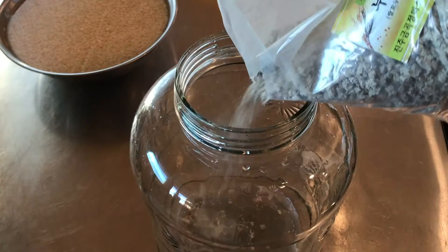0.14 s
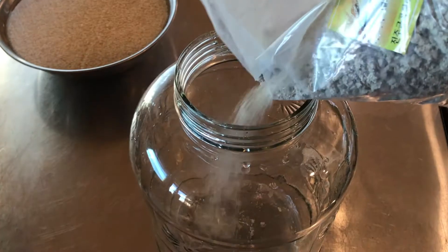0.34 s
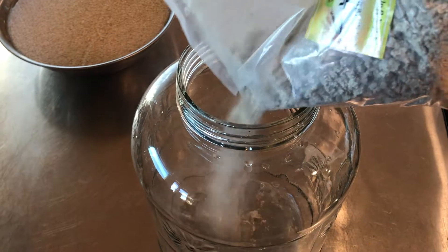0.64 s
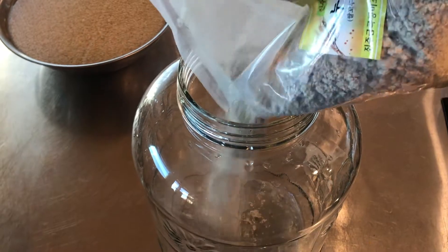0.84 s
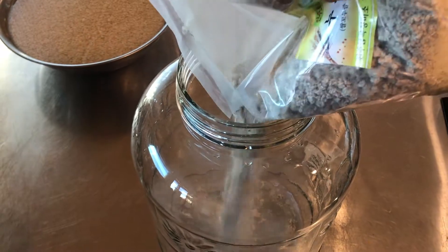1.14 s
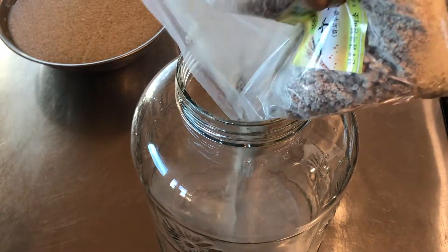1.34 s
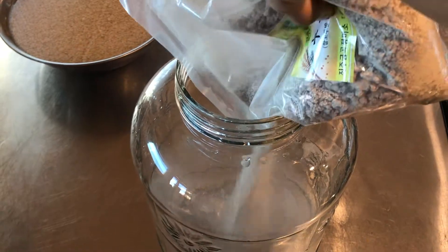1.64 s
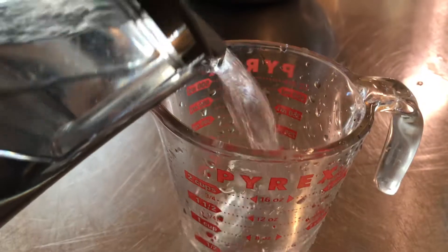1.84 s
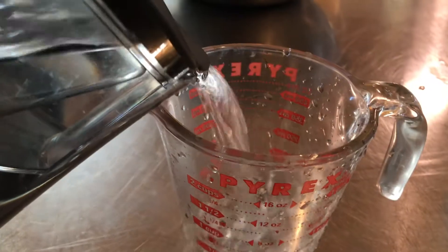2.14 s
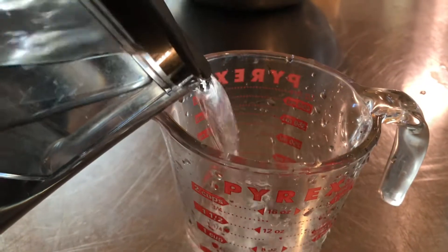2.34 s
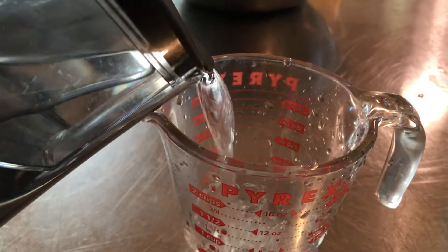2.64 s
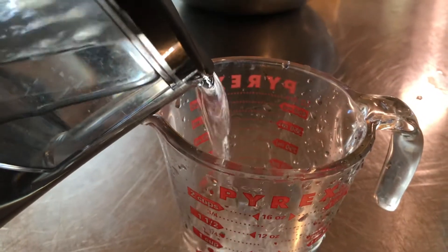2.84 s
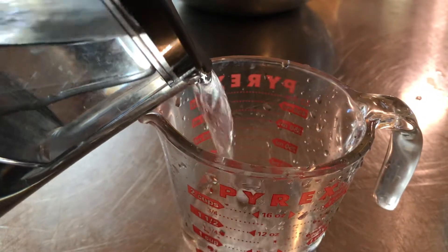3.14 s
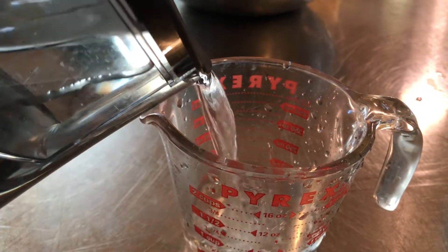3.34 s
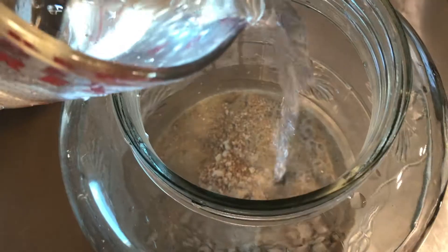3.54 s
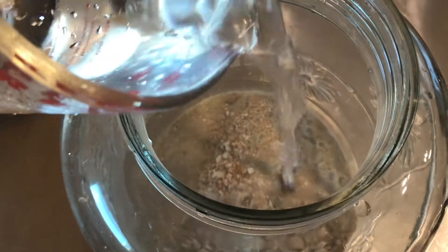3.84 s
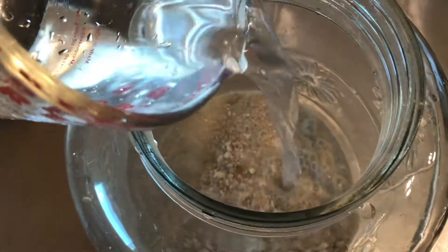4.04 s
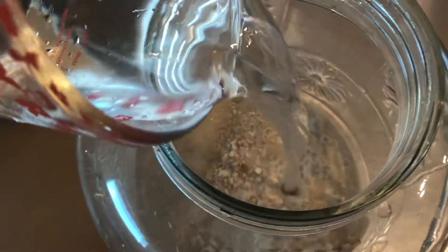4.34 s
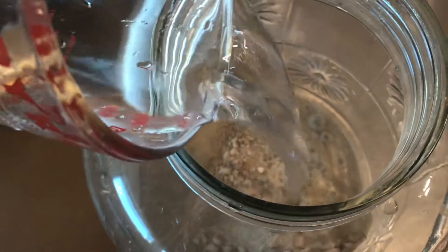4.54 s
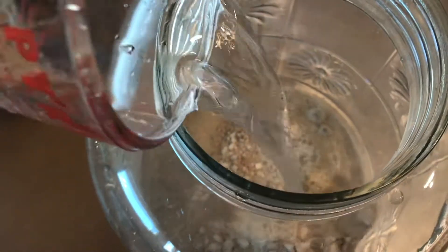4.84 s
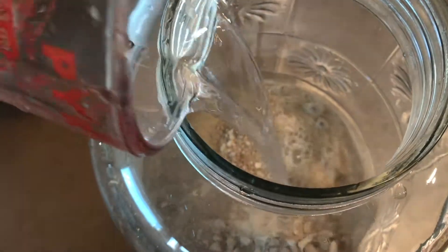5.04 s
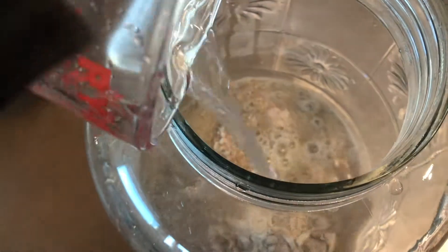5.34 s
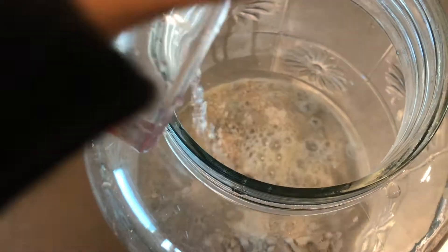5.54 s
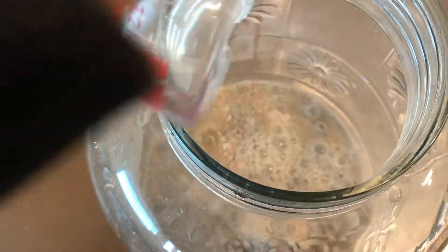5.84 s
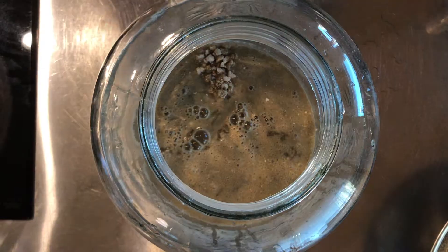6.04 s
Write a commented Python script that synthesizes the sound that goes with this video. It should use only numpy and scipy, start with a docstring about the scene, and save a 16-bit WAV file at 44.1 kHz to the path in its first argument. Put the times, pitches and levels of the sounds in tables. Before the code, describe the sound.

In a small kitchen, dry grains run from a bag into a big glass jar, ringing the glass before dulling to a hiss. Water from a kettle splashes and bubbles into a measuring cup. The cup is emptied into the jar, first in a thin stream, then in hollow gulps, and clinks on the rim. A few drips fall, and a sharp knock on the jar cuts off abruptly. Everything sounds close.

```python
"""Dry grains run from a bag into a big glass jar, ringing the glass until the heap muffles them to a hiss.
They thin to a trickle. A kettle fills a measuring cup with splashes and ringing bubbles. The cup is
emptied into the jar, first in a thin stream, then in gulps that sound the air inside, and clinks on the
rim. Last drips fall, and a sharp knock on the jar is cut short, leaving the low rumble of the kitchen."""
import sys
import numpy as np
from scipy import signal
from scipy.fft import rfft, irfft
from scipy.io import wavfile
from scipy.ndimage import uniform_filter1d

SR = 44100
rng = np.random.default_rng(int(sys.argv[2]) if len(sys.argv) > 2 else 0)


def wrap_up_sound(samples):
    """Save the sound to the file named by the first command line argument, as 16-bit audio."""
    columns = np.atleast_2d(samples).T
    # keep every value between -1 and 1, then stretch to whole-number steps
    tamed = np.clip(columns, -1, 1)
    steps = np.round(tamed * 32767).astype(np.int16)
    wavfile.write(sys.argv[1], SR, steps)


N = 273464
T = np.arange(N) / SR

# the deep boom and the middle notes of the air in the jar: pitch_hz, width_hz, gain_db
JAR_BOOM = [(130.2, 8.7, -0.5), (198.3, 200, -21.5), (272.6, 42, -16), (328, 36, -11), (356.5, 50, -23)]
JAR_AIR = [(587, 27, 0), (690, 30, -13), (1114, 24, -8)]
# notes of the glass jar with water in it: pitch_hz, level_db, decay_s
JAR_GLASS = [(1250, -10, 0.098), (1762, -5, .2), (2117, -2.5, .25), (2360, -1, 0.059), (2940, -15, 0.097),
             (5060, -15.5, 0.018), (5870, -21.5, .12), (5950, -12, 0.033), (8070, -20, 0.14)]
# tone of a hard hit on the glass: pitch_hz, gain_db
CRACK_TONE = [(300, -1.5), (650, -4.5), (1000, -0.5), (1400, -3), (2000, 0), (2900, 1.5), (3900, -6.5),
              (4500, -18.5), (5100, -14), (5600, -20), (6200, -17.5), (7000, -19), (8200, -22.5),
              (10000, -29.5), (16000, -29.5)]


def amp(db):
    """Turn decibels into a gain."""
    return 10 ** (np.asarray(db) / 20)


def rms_one(x):
    """Scale a sound to an average (rms) level of 1."""
    return x / np.sqrt(np.mean(x ** 2) + 1e-20)


def at_peak(db, x):
    """Scale a sound so that its peak is at db."""
    return amp(db) * x / np.max(np.abs(x))


def curve(rows):
    """A gain that follows (time_s, level_db) points and is silent outside them."""
    times, levels = np.transpose(rows)
    return amp(np.interp(T, times, levels, left=-200, right=-200))


def swells(rows, attack_s, release_s):
    """A gain that rises, holds and fades for each (start_s, length_s, level_db) row."""
    out = np.zeros(N)
    for start, length, db in rows:
        rising = np.clip((T - start) / attack_s, 0, 1)
        out += amp(db) * rising * np.exp(-np.maximum(T - start - length, 0) / release_s)
    return out


def even(x, window_s=0.094):
    """Hold the running level near 1, so that a gain curve alone sets the loudness."""
    size = int(window_s * SR)
    power = np.abs(uniform_filter1d(uniform_filter1d(x ** 2, size), size))
    return x / np.sqrt(power + 1e-5 * np.mean(x ** 2))


def add(out, start_s, sound):
    """Mix a short sound in at start_s."""
    at = int(np.clip(start_s * SR, 0, N - 1))
    out[at:at + len(sound)] += sound[:N - at]


def colour(x, tone, size=8192):
    """Filter a sound to follow a tone curve of (pitch_hz, gain_db) points."""
    hz, db = np.transpose(tone)
    log_hz = np.log(np.maximum(np.fft.rfftfreq(size, 1 / SR), 1))
    beyond = np.abs(log_hz - np.clip(log_hz, np.log(hz[0]), np.log(hz[-1])))
    log_gain = np.log(amp(np.interp(log_hz, np.log(hz), db))) - 2 * np.minimum(beyond, 2)
    cepstrum = irfft(log_gain)
    cepstrum[1:size // 2] *= 2   # minimum phase: nothing rings before the hit
    cepstrum[size // 2 + 1:] = 0
    return signal.fftconvolve(x, irfft(np.exp(rfft(cepstrum))))[:len(x)]


def resonate(x, notes):
    """Let a sound ring a set of (pitch_hz, width_hz, gain_db) resonances."""
    out = 0
    for hz, width, db in notes:
        r = np.exp(-np.pi * width / SR)
        feedback = [1, -2 * r * np.cos(2 * np.pi * hz / SR), r * r]
        out = out + amp(db) * (1 - r * r) / 2 * signal.lfilter([1, 0, -1], feedback, x + 1e-18)
    return out


def fade(decay_s):
    """A gain that falls by 60 dB in decay_s."""
    return np.exp(-np.log(1000) * T[:int(1.3 * decay_s * SR) + 2] / decay_s)


def burst(decay_s):
    """A puff of noise that dies away."""
    shape = fade(decay_s)[:SR // 2]
    return rng.standard_normal(SR // 2) * np.pad(shape, (0, SR // 2 - len(shape)))


def thud(decay_s):
    """A single push: the longer it lasts, the duller it sounds."""
    return np.exp(-np.log(1000) * T[:SR // 2] / decay_s)


def struck(notes):
    """A struck object rings with fading (pitch_hz, level_db, decay_s) notes."""
    t, out = T[:SR], np.zeros(SR)
    for k, (hz, db, decay_s) in enumerate(notes):
        out += (-1) ** k * amp(db) * np.sin(2 * np.pi * hz * t) * np.exp(-np.log(1000) * t / decay_s)
    return out


def impacts(per_s, spread_db):
    """A hail of tiny hits of uneven strength."""
    hits = rng.random(N) < per_s / SR
    strength = amp(spread_db * np.minimum(rng.exponential(1, N), 4))
    return hits * strength * rng.choice([-1, 1], N)


def spatter(per_s, spread_db, decay_s):
    """Droplets burst at random, each a short puff of noise."""
    power = signal.fftconvolve(impacts(per_s, spread_db) ** 2, fade(decay_s) ** 2)[:N]
    return np.sqrt(np.abs(power)) * rng.standard_normal(N)


def bubble(hz, cycles, rise, swell=1.7):
    """A new bubble swells in a cycle or two and rings, its pitch rising as it nears the surface."""
    shape = fade(cycles / hz)
    turns = hz * T[:len(shape)]
    onset = 1 - np.exp(-(turns / swell) ** 2)
    return shape * onset * np.sin(2 * np.pi * turns * (1 + rise * turns / (2 * cycles)))


def bubbles(stream, low_hz, high_hz, cycles, rise, spread_db, count):
    """Bubbles of all sizes form at random while the stream runs."""
    out = np.zeros(N)
    start, end = stream[0][0] - .1, stream[-1][0] + .1
    for when, pitch, size, sign in rng.random((count, 4)):
        hz = low_hz * (high_hz / low_hz) ** pitch
        strength = hz * amp(-spread_db * np.log(max(size, .05))) * np.sign(sign - .5)
        add(out, start + when * (end - start), strength * bubble(hz, cycles, rise))
    return out


def echoes(x, decay_s, echo_db):
    """Hard walls add a dense tail of echoes to a sound."""
    tail = burst(decay_s) * (1 - np.exp(-T[:SR // 2] / 0.00043))
    return x + amp(echo_db) * signal.fftconvolve(x, tail / np.linalg.norm(tail))[:N]


def room():
    """The kitchen rumbles quietly; a faint low hum swells around the last drips."""
    # tone of the rumble: pitch_hz, gain_db
    rumble_tone = [(25, -21), (45, -5), (58, 6.5), (80, -8.5), (130, -7), (250, -8.5), (500, -17),
                   (1000, -23), (3000, -30.5), (8000, -36.5), (16000, -42.5)]
    # its loudness: time_s, level_db
    rumble_level = [(0, -75.5), (0.9, -68.5), (1.425, -63.5), (1.45, -77), (3.3, -76), (5.9, -66),
                    (6.0, -73), (6.21, -77)]
    rumble = curve(rumble_level) * rms_one(colour(rng.standard_normal(N), rumble_tone))
    hum = curve([(5.78, -83), (5.83, -68.5), (5.93, -59)]) * np.sin(2 * np.pi * 231 * T)
    return rumble + hum


def drips():
    """The last drops plink in the jar; those that snap against the glass leave a thin sizzle."""
    # falling drops: start_s, plink_db, pitch_hz, snap_db
    drops = [(5.698, -41.5, 3325, -73), (5.728, -45, 4790, -41), (5.749, -50.5, 4340, -67),
             (5.833, -62, 7060, -51.5)]
    plinks, snaps = np.zeros((2, N))
    for start, db, hz, snap_db in drops:
        add(plinks, start, at_peak(db, resonate(burst(0.023), [(hz, 1100, 0)])))
        snap = burst(0.0064) + amp(-13.5) * burst(0.2)
        add(snaps, start, at_peak(snap_db, resonate(snap, [(12500, 6000, 0)])))
    return snaps + echoes(plinks, decay_s=0.15, echo_db=-7)


def clink():
    """The cup touches the rim and bounces once; both glasses ring."""
    # notes of the cup: pitch_hz, level_db, decay_s
    cup_glass = [(677, 10, 0.089), (2510, -4.5, 0.78), (3744, -1, 0.31)]
    # the touch and the bounce: start_s, gain_db
    touches = [(5.197, 2.5), (5.222, -8)]
    out = np.zeros(N)
    for start, db in touches:
        add(out, start, amp(db - 48) * struck(cup_glass) + amp(db - 46) * struck(JAR_GLASS))
        add(out, start, at_peak(db - 42, colour(burst(0.049), CRACK_TONE)))
        add(out, start, at_peak(db - 40, resonate(thud(0.001), JAR_BOOM + JAR_AIR)))
    return out


def knock(start_s=5.935):
    """A hard hit cracks on the glass; a moment later the whole jar heaves and its air booms."""
    # tone of the heaving jar: pitch_hz, gain_db
    thump_tone = [(30, -40.5), (50, -12), (80, -14), (128, 1.5), (160, -8), (200, -5.5), (255, -17),
                  (325, -7.5), (430, -14)]
    out = np.zeros(N)
    add(out, start_s, at_peak(-16.5, colour(burst(0.034), CRACK_TONE)))
    add(out, start_s, amp(-27.5) * struck(JAR_GLASS))
    add(out, start_s + 0.0037, amp(-16.5) * struck([(594, 0.0048, 0.07)]))
    add(out, start_s + 0.0042, at_peak(-19.5, colour(thud(0.0011), thump_tone)))
    return out


def gurgle(scatter, cycles, count):
    """A cloud of bubbles in the cup hums lower as the water deepens."""
    # note of the cloud: time_s, pitch_hz
    cloud_pitch = [(1.9, 773), (2.55, 814), (2.8, 754), (3.0, 600), (3.36, 533)]
    times, pitches = np.transpose(cloud_pitch)
    out = np.zeros(N)
    for when, detune, size in rng.random((count, 3)):
        start = times[0] - .1 + when * (times[-1] - times[0] + .1)
        hz = np.interp(start, times, pitches) * np.exp(scatter * (2 * detune - 1))
        add(out, start, (.5 + size) * bubble(hz, cycles, rise=0.067))
    return even(out)


def kettle_into_cup():
    """Water from the kettle splatters in the cup and traps air as ringing bubbles."""
    # flow from the kettle: time_s, gain_db
    stream = [(1.69, -16), (1.8, -6), (1.95, -3.5), (2.25, 1.5), (2.7, -1.5), (3.05, -1.5), (3.2, -8),
              (3.37, -0.5)]
    # tones of the low bubbling and the fine spray: pitch_hz, gain_db
    bubbling_tone = [(290, -33), (500, -36), (712, -21), (782, -8.5), (1070, -6.5), (1550, -7),
                     (2180, -7.5), (2680, -22), (2800, -15), (3640, -70), (6160, -120)]
    spray_tone = [(2000, -24), (2700, -17.5), (3200, 3), (3700, -0.5), (4200, -5.5), (5400, -6.5),
                  (6300, -4.5), (7700, -9), (8800, -3.5), (10400, -15), (12000, -9), (16000, -17)]
    # the stream drags a cloud of bubbles under: start_s, length_s, level_db
    plunges = [(1.88, 0.02, -72), (2.17, 0.079, -74), (2.45, 0.095, -72), (2.63, 0.15, -69.5),
               (2.84, 0.25, -75)]
    # the loudest single bubbles: start_s, gain_db, pitch_hz
    loud_bubbles = [(1.8147, -53, 5100), (1.827, -47.5, 5400), (1.847, -44.5, 1540), (1.961, -49, 1990),
                    (2.002, -49, 6100), (2.066, -51, 1820), (2.2043, -49.5, 6100), (2.273, -53.5, 750),
                    (2.338, -53, 2120), (2.388, -53, 2120), (2.4303, -48, 9200), (2.4435, -45.5, 1180),
                    (2.661, -49.5, 828), (2.698, -49.5, 3040), (2.844, -50, 2340), (2.87, -57, 755),
                    (2.8697, -49, 3224), (3.126, -54.5, 6050), (3.181, -56, 1250), (3.2111, -53.5, 6050)]
    flow = curve(stream)
    splatter = even(spatter(per_s=220, spread_db=1, decay_s=0.017), window_s=0.16)
    low = even(bubbles(stream, 623, 2820, cycles=40, rise=0.12, spread_db=2, count=700))
    high = even(bubbles(stream, 2470, 14900, cycles=36, rise=0.06, spread_db=9.5, count=1700))
    spray = echoes(high + amp(1) * splatter, decay_s=0.0085, echo_db=-11)
    out = amp(-72) * flow * even(colour(low + amp(2) * splatter, bubbling_tone))
    out += amp(-74.5) * flow ** 0.33 * even(colour(spray, spray_tone), window_s=0.44)
    out += swells(plunges, attack_s=0.0083, release_s=0.093) * gurgle(scatter=0.14, cycles=40, count=230)
    plops = np.zeros(N)
    for start, db, hz in loud_bubbles:
        if hz < 2800:   # big bubbles plop, small ones mostly tick
            add(plops, start, at_peak(db - 5.5, bubble(hz, cycles=63, rise=0.24, swell=0.83)))
            add(plops, start, at_peak(db - 15, colour(burst(0.012), bubbling_tone)))
        else:
            add(plops, start, at_peak(db - 6, bubble(hz, cycles=57, rise=0.08, swell=1.5)))
            add(plops, start, at_peak(db - 5, colour(burst(0.02), spray_tone)))
    return out + echoes(plops, decay_s=0.025, echo_db=-5)


def pool(time_s, start_s=4.3, forms_s=0.12):
    """How far a pool of water covers the grain and cushions the spatter, from 0 to 1."""
    return np.clip((time_s - start_s) / forms_s, 0, 1)


def gulps():
    """Gulps of air go under as big bubbles that ring the air in the jar."""
    # each gulp: start_s, gain_db
    glugs = [(3.612, -55.5), (4.192, -73), (4.424, -46.5), (4.527, -44), (4.673, -47), (4.846, -40),
             (4.961, -41.5), (5.03, -40), (5.215, -40), (5.386, -39.5), (5.537, -38.5), (5.573, -42.5)]
    glug = np.pad(bubble(583, cycles=32, rise=0.17, swell=1.0), (0, SR // 4))
    out = np.zeros(N)
    for start, db in glugs:
        add(out, start, at_peak(db - 5, glug) + at_peak(db - 10, resonate(glug, JAR_AIR)))
    return out


def cup_into_jar():
    """Water spatters on the wet grain, then plunges; drops and bubbles sound the air in the jar."""
    # a thin stream, a gush, the last dribble: time_s, gain_db
    stream = [(3.38, -7.5), (3.41, -14), (3.62, -10), (3.68, -6.5), (3.86, -11.5), (4.18, -11.5), (4.2, -1),
              (4.4, 3.5), (4.55, -5.5), (4.7, 2), (4.9, -0.5), (5.06, 4.5), (5.34, 3.5), (5.59, 2.5),
              (5.63, -7), (5.74, -11), (5.8, -30), (5.93, -29)]
    # high notes of the air under the jar's neck: pitch_hz, width_hz, gain_db
    neck_notes = [(1097, 46, 5.5), (1340, 80, -6), (1666, 120, 3.5), (1840, 120, 6), (1990, 32, -1.5),
                  (2333, 57, 8), (2430, 84, -16.5), (2950, 18, 3.5), (3300, 150, -25.5)]
    # tone of the spray: pitch_hz, gain_db
    spray_tone = [(2000, -11), (3200, -7), (4200, -7.5), (4900, -12.5), (5700, -4.5), (7200, -7.5),
                  (7800, -11), (9000, -10.5), (10300, -15.5), (12000, -11), (16000, -15)]
    # the stream digs into the pool and froths: start_s, length_s, level_db
    froths = [(4.365, 0.045, -71), (4.985, 0.14, -52), (5.42, 0.13, -59)]
    # the gush slaps the wet mound: start_s, level_db
    slaps = [(4.191, -44), (4.237, -43), (4.267, -50), (4.301, -44)]
    # the loudest splashes: start_s, gain_db, pitch_hz
    splashes = [(3.392, -55.5, 2260), (3.4447, -49, 2140), (3.469, -50, 2190), (3.4972, -57, 1750),
                (3.511, -73, 1810), (3.611, -46, 1860), (3.7717, -45.5, 3050), (3.8277, -48.5, 1980),
                (3.9143, -48.5, 3400), (4.191, -44.5, 2290), (4.202, -42.5, 1850), (4.2979, -49.5, 1860),
                (4.37, -45, 1775), (4.3956, -39.5, 2340), (4.6221, -51.5, 2320), (4.8451, -46, 1800),
                (4.9813, -34.5, 1900), (5.013, -45, 1760), (5.049, -35, 1780), (5.1161, -44.5, 2400),
                (5.306, -37.5, 1940), (5.4516, -39, 2460), (5.493, -39.5, 2550), (5.5751, -38.5, 1830)]
    flow = curve(stream)
    froth = swells(froths, attack_s=0.0071, release_s=0.014)
    wash = even(spatter(per_s=1300, spread_db=3.5, decay_s=0.012), window_s=0.12)   # the stream itself
    droplets = even(spatter(per_s=870, spread_db=7, decay_s=0.018), window_s=0.1)
    churn = bubbles(stream, 69, 492, cycles=1.6, rise=0.069, spread_db=1.5, count=800)
    large = even(bubbles(stream, 503, 1316, cycles=15, rise=0.3, spread_db=4.5, count=900))
    middle = even(bubbles(stream, 930, 3830, cycles=44, rise=0.098, spread_db=6.5, count=1700))
    small = even(bubbles(stream, 2960, 13800, cycles=20, rise=0.07, spread_db=9.5, count=3000))
    neck = even(resonate(middle + amp(11) * wash, neck_notes))
    spray = echoes(small + amp(-0.5) * droplets, decay_s=0.035, echo_db=1)
    out = amp(-60 - 2 * pool(T)) * flow ** 0.9 * even(resonate(churn, JAR_BOOM))
    out += amp(-59.5) * flow * even(resonate(large + amp(8) * wash, JAR_AIR))
    out += (amp(-61) * flow ** 0.63 + amp(-7) * froth) * neck
    out += amp(-61.5 - 10 * pool(T)) * flow ** 0.26 * even(colour(spray, spray_tone))
    drops = np.zeros(N)
    for start, db in slaps:
        slap = resonate(burst(0.084), [(129, 47, 9.5), (304, 99, 10), (536, 120, -8)])
        add(drops, start, at_peak(db, slap))
    for start, db, hz in splashes:
        add(drops, start, at_peak(db - 1, bubble(hz, cycles=44, rise=0.02, swell=0.83)))
        add(drops, start, at_peak(db - 2.5, resonate(burst(0.014), neck_notes)))
        add(drops, start, at_peak(db - 0.5 - 25 * pool(start), colour(burst(0.025), spray_tone)))
    return out + echoes(drops, decay_s=0.061, echo_db=-3)


def trickle():
    """The last grains fall as a faint hail of tiny hits."""
    # tone of the trickle: pitch_hz, gain_db
    tone = [(59, -34), (100, -4), (202, -14), (239, -14), (524, -14), (634, -15), (1080, -4), (2000, -5),
            (4470, -18), (16000, -21)]
    # its loudness: time_s, level_db
    level = [(1.428, -64), (1.5, -64.5), (1.688, -66.5)]
    return curve(level) * rms_one(colour(impacts(per_s=9000, spread_db=2.5), tone))


def grains(stop_s=1.428):
    """Grains ring the bare glass in surges; the growing heap muffles them into a hiss."""
    # flow from the bag, and how hard it rings bare glass: time_s, gain_db
    stream = [(0.012, -13), (0.04, -6), (0.14, -8.5), (0.21, -5), (0.55, -2.5), (0.66, -0.5), (0.97, -7),
              (1.06, -6.5), (1.24, -7.5), (1.46, -6)]
    bare_glass = [(0.012, -19), (0.33, -15.5), (0.37, -3.5), (0.52, -5.5), (0.75, -21.5), (1.1, -19.5),
                  (1.46, -29)]
    # tones of the hissing heap and the low patter: pitch_hz, gain_db
    heap_tone = [(410, -52), (700, -55.5), (757, -8), (1110, 4.5), (1540, 2), (1870, -3), (2100, 3),
                 (2880, -1), (3410, 3), (4920, -2.5), (5470, -3), (8760, -6.5), (14400, -16),
                 (16000, -16.5)]
    patter_tone = [(50, -12), (90, 3), (125, 1), (200, -3.5), (350, -1.5), (600, -2.5), (800, -17),
                   (1200, -32)]
    # base, wall and high notes of the dry jar: pitch_hz, width_hz, gain_db
    base_notes = [(1002, 16, -4), (1128, 20, 0), (1176, 25, -5)]
    wall_notes = [(2090, 20, -4), (2115, 24, 0), (2398, 14, -13)]
    high_notes = [(3543, 16, 0), (3816, 25, -7), (4108, 14, 0), (4338, 11, -9), (4510, 110, -11),
                  (5272, 32, -2), (5337, 30, -3), (5808, 30, -10), (5846, 18, -9), (6223, 45, -10),
                  (6520, 130, -14), (7030, 30, -13), (8545, 18, -12)]
    # clumps spray the wall, and fine grains skitter over it: start_s, length_s, gain_db
    surges = [(0.012, 0.038, -43), (0.18, 0.055, -43.5), (0.303, 0.006, -39.5), (1.02, 0.035, -48.5)]
    skitters = [(0.105, 0.017, -48.5), (0.177, 0.012, -44.5), (0.432, 0.008, -41), (0.467, 0.0074, -59)]
    # coarse pieces hit the jar, and the bag is nudged: start_s, level_db
    pieces = [(0.364, -31), (0.414, -30.5), (0.469, -41), (0.936, -35), (1.3376, -25)]
    nudges = [(0.300, -42), (0.645, -39), (0.807, -45), (1.423, -49.5)]
    flow, bare = curve(stream), curve(bare_glass)
    surge = swells(surges, attack_s=0.0034, release_s=0.019)
    skitter = swells(skitters, attack_s=0.0043, release_s=0.048)
    hail = impacts(per_s=9000, spread_db=2.5)
    heavy = impacts(per_s=2500, spread_db=0)   # the grains that make the glass ring
    out = amp(-44) * flow * even(colour(hail, heap_tone))
    out += skitter * even(colour(hail, [(4000, 2), (7500, 7.5), (11000, 0), (16000, -3.5)]))
    out += amp(-57) * flow ** 0.93 * even(colour(impacts(per_s=2700, spread_db=2.5), patter_tone))
    out += (amp(-43) * bare + amp(-21.5) * surge) * even(resonate(heavy, base_notes), window_s=0.16)
    out += (amp(-48.5) * bare + amp(-5) * surge) * even(resonate(heavy, wall_notes), window_s=0.11)
    out += (amp(-41) * bare ** 0.94 + amp(-4) * surge) * even(resonate(heavy, high_notes), window_s=0.15)
    for start, db in pieces:
        tick = resonate(burst(0.008), [(1510, 280, 12), (3040, 860, 4.5), (5170, 930, -58)])
        add(out, start, at_peak(db, tick))
    # each nudge shakes a clump loose and makes a soft bump
    clumps = swells([(start, 0.035, -50) for start, _ in nudges], attack_s=0.011, release_s=0.0081)
    out += clumps * even(colour(impacts(per_s=5400, spread_db=4.5), heap_tone))
    for start, db in nudges:
        add(out, start, at_peak(db, resonate(burst(0.049), [(296, 180, 0)])))
    return out * (T < stop_s)


def scene():
    """All the sources echo in a small kitchen, over its low rumble."""
    sources = grains() + trickle() + kettle_into_cup() + cup_into_jar() + gulps()
    sources += drips() + clink() + knock()
    cut_short = np.clip((5.958 - T) / 0.00077, 0, 1)   # the knock and its echoes stop dead
    return (echoes(sources, decay_s=0.39, echo_db=-14) * cut_short + room())[None]


def record(dry):
    """The very highest treble is cut off steeply."""
    cutoff_hz = 15900
    return signal.sosfilt(signal.ellip(10, .2, 80, cutoff_hz, fs=SR, output="sos"), dry)


dry = scene()
out = record(dry)
wrap_up_sound(out)
```